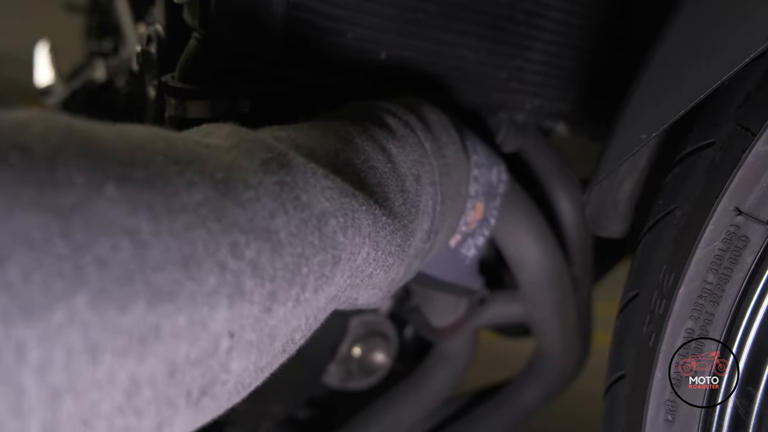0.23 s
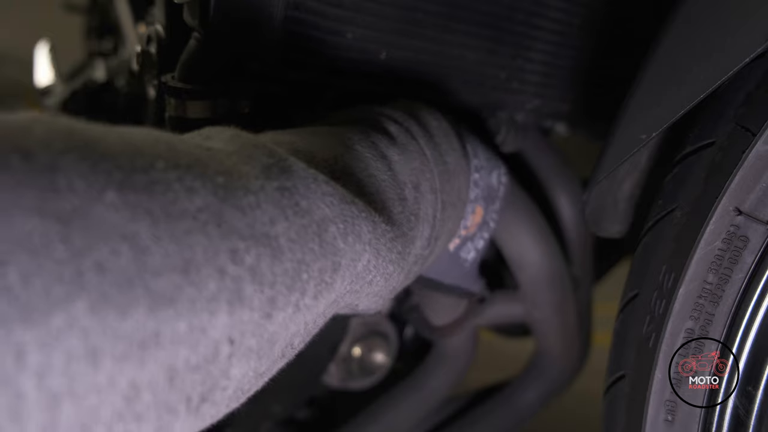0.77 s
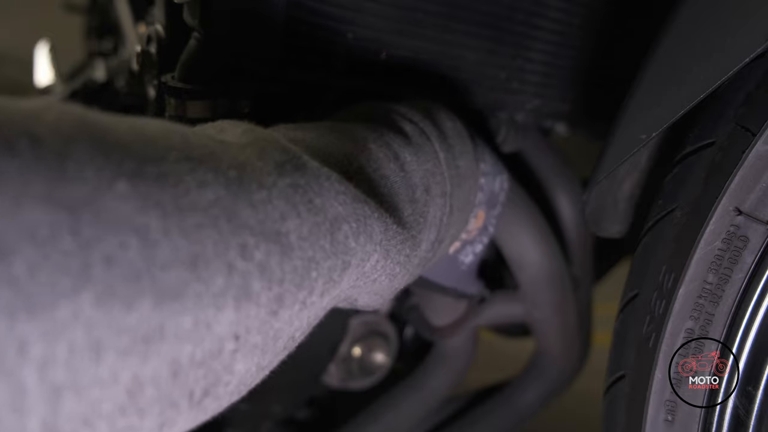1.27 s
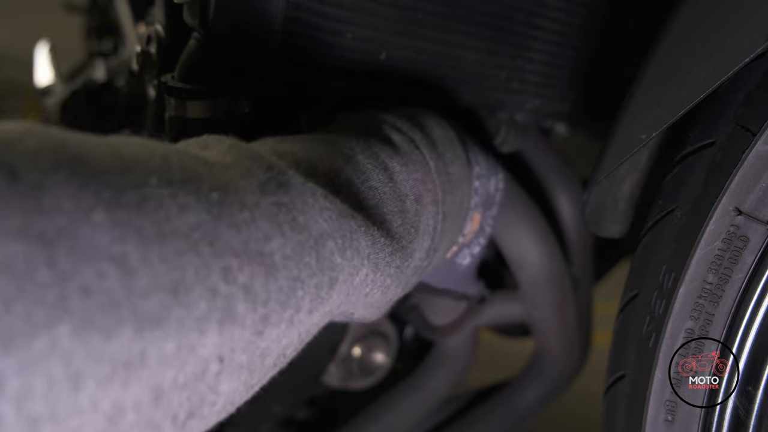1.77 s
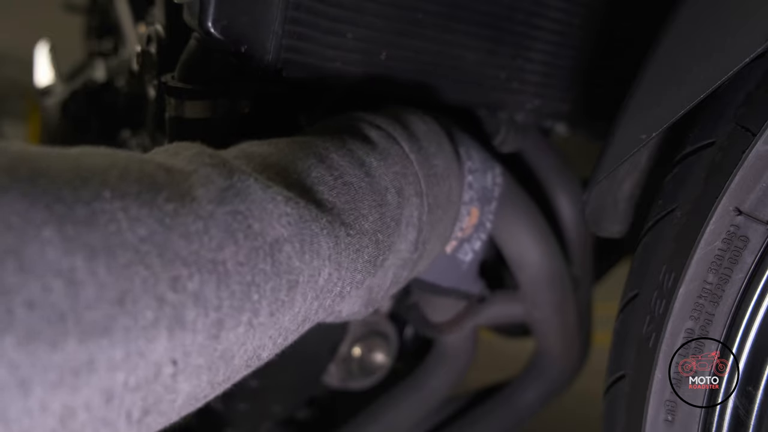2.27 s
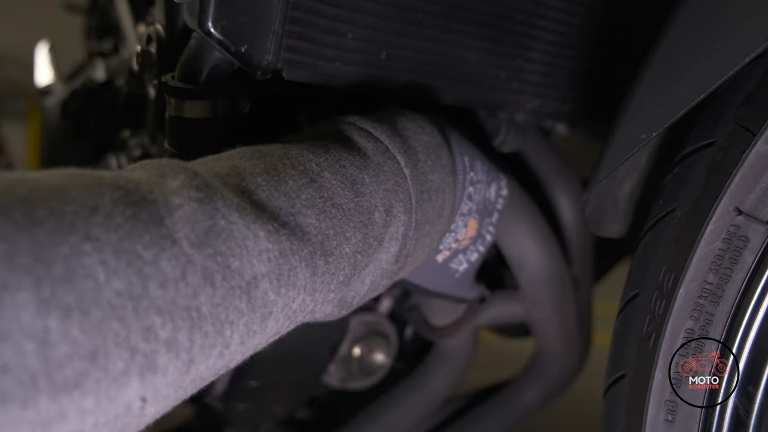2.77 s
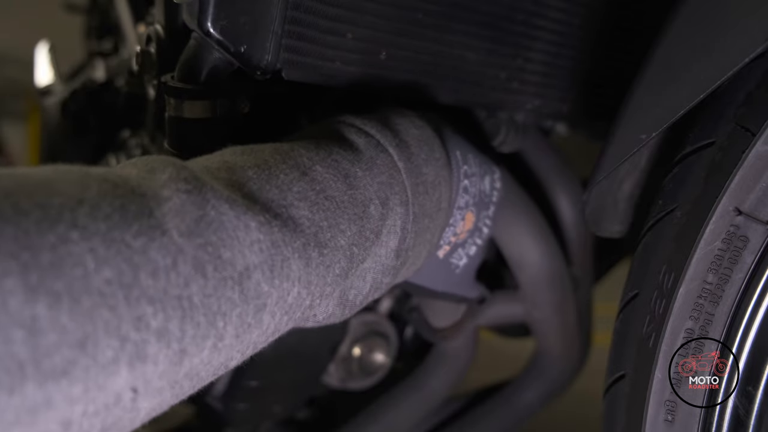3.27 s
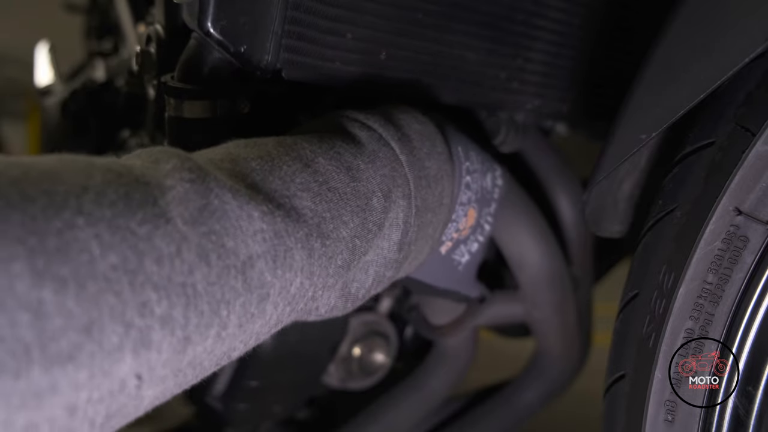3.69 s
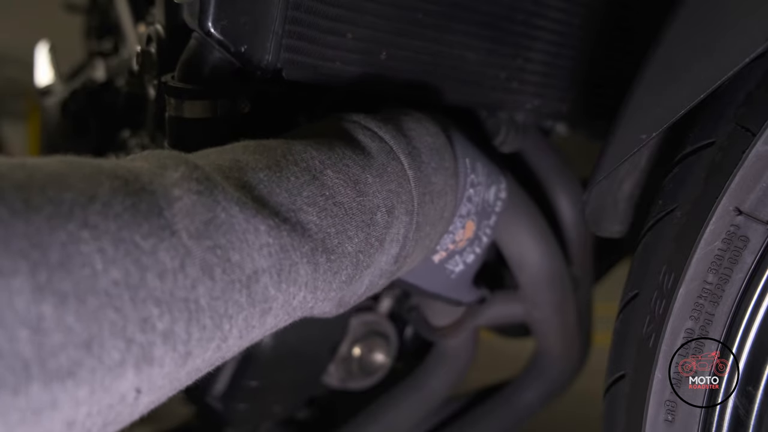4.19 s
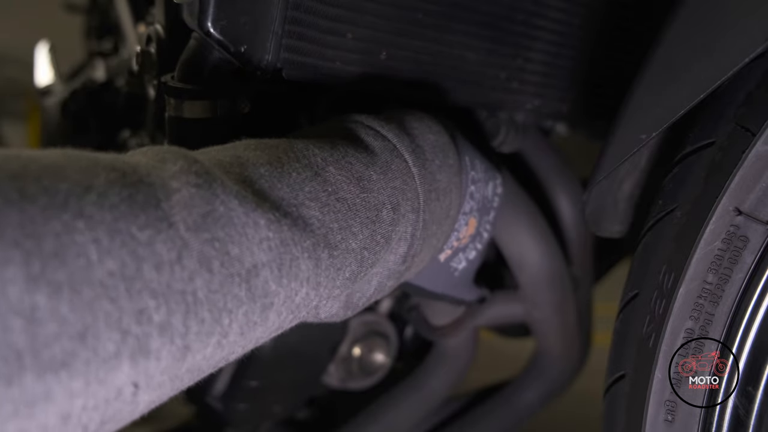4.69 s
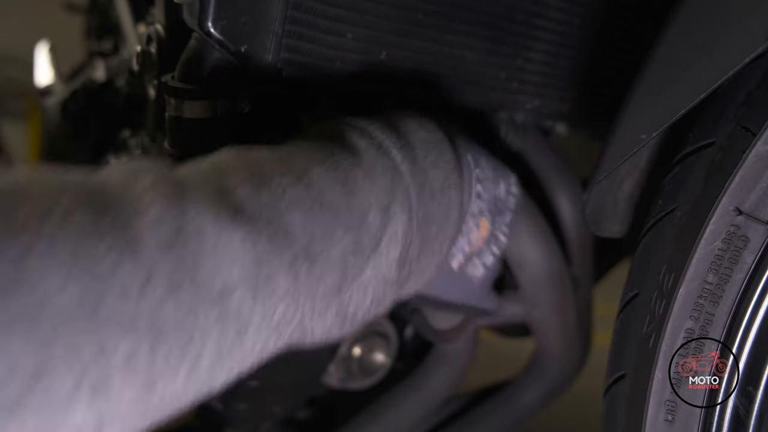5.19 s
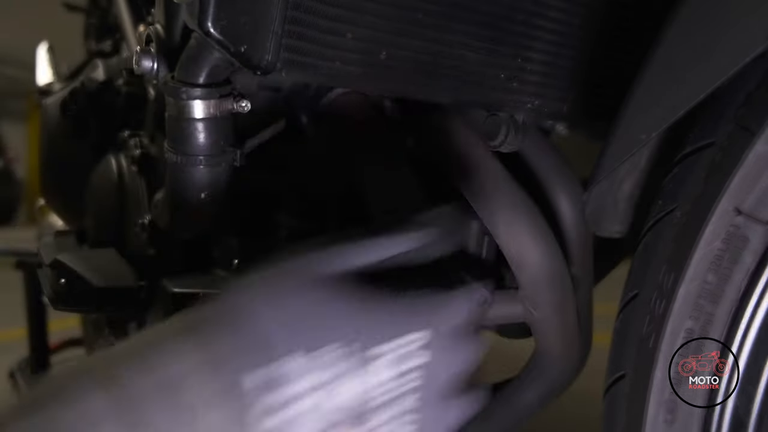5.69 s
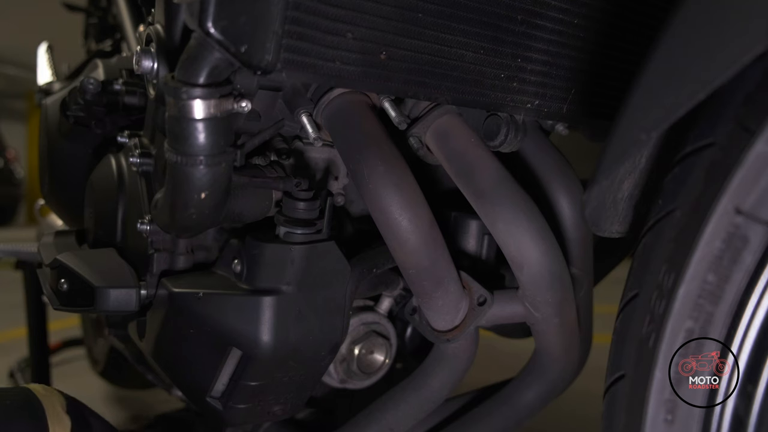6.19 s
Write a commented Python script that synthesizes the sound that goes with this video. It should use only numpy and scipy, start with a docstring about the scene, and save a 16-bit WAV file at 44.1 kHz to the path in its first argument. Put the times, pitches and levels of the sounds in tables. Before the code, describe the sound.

A tight motorcycle exhaust bolt is loosened by hand, heard close in a large garage with a light echo and a faint, steady ventilation hum. The dry thread gives very high, gliding, slightly gritty squeaks, each a fraction of a second long. They come right at the start, then around 0.4, 1.3, 1.7, 2.0, 2.4, 2.8 and 3.2 seconds. The strongest cluster rises in pitch at about 3.5 seconds, and a last one follows near 4.6. A thin, high ring from the steel tool lingers after several squeaks. Between turns the tool makes quiet ticks and scuffs, with a few very faint peeps. At about 5.2 seconds a single short, hollow knock ends the work. A sleeve then rustles softly as the arm draws back, mostly from 5.6 to 6.4 seconds, with one more light tick at 6 seconds.

```python
"""High, gliding squeaks come in short bursts: a tight motorcycle exhaust bolt is being loosened by hand.
At each turn the dry thread sticks and slips, and the tool ticks as it is set for the next turn.
A hollow knock ends the work, and a sleeve rustles as the arm is drawn back.
The squeaks, ticks and knock echo in a large garage, where the ventilation hums throughout."""
import sys
import numpy as np
from scipy import signal
from scipy.fft import rfft, irfft, next_fast_len
from scipy.io import wavfile
from scipy.ndimage import uniform_filter1d

SR = 44100
rng = np.random.default_rng(int(sys.argv[2]) if len(sys.argv) > 2 else 0)


def master(y):
    """Save y as 16-bit WAV."""
    cut = np.clip(np.atleast_2d(y).T, -1, 1)
    pcm = np.round(cut * 32767)  # scale
    wavfile.write(sys.argv[1], SR, pcm.astype(np.int16))


N = 284004
LEAD = SR // 10   # extra samples before time zero, so the scene can open in mid-squeak
TIME = np.arange(-LEAD, N) / SR


# Slips of the thread, a few to each turn: t/s, length/s, starting f/Hz, final f/Hz, relative level/dB
SLIPS = [(-.055, 0.053, 8450, 12600, -28.5), (0.357, 0.039, 9650, 11750, -28),
         (0.405, 0.0067, 11900, 12050, -32), (0.487, .012, 9350, 9330, -27.5),
         (1.261, .011, 8320, 9900, -27), (1.277, 0.014, 10350, 10000, -27.5),
         (1.296, 0.018, 8760, 9100, -24.5), (1.67, 0.016, 6830, 8500, -19), (2.041, .035, 7670, 11740, -27),
         (2.076, 0.021, 11600, 11000, -30.5), (2.384, 0.0118, 7770, 8710, -28),
         (2.4, 0.0092, 8500, 8740, -23.5), (2.411, 0.013, 9050, 9400, -24),
         (2.429, 0.02, 9330, 10400, -37.5), (2.45, 0.0067, 9630, 9630, -22), (2.738, .014, 6940, 6540, -33),
         (2.751, 0.015, 5660, 5340, -25.5), (2.77, 0.0127, 6220, 6500, -25),
         (2.785, 0.024, 7330, 7560, -26), (3.180, 0.0098, 11470, 12040, -28.5),
         (3.421, 0.0078, 4630, 4700, -24), (3.426, .011, 5500, 5370, -27), (3.437, 0.017, 5370, 6020, -20),
         (3.457, 0.021, 6830, 9000, -19), (3.486, 0.0083, 7730, 9550, -17.5),
         (3.506, .007, 9100, 9500, -19), (4.528, 0.034, 6150, 6950, -28), (4.565, 0.0086, 7170, 7570, -20),
         (4.574, 0.0094, 8020, 9200, -20)]
def thread_slips(attack_s=0.0038, release_s=0.0023, fade_db=2, overshoot=.16, settle_s=0.0015):
    """Pitch and level of the squeak: a slip from rest starts too high, settles, glides and lets go."""
    lag_s = 0.0022   # time the pitch takes to change from one slip to the next
    hz, level = np.zeros(len(TIME)) + SLIPS[0][2], np.zeros(len(TIME))
    for s, length, start_hz, end_hz, db in SLIPS:
        near = (TIME >= s - lag_s / 2) & (TIME < s + length + 20 * release_s)
        age = np.maximum(TIME[near] - s, 0)
        progress = np.minimum(age / length, 1)
        glide = start_hz + (end_hz - start_hz) * progress ** 1.25   # starts slowly, gathers speed
        at_rest = 1 - min(level[near][0] / from_db(db - fade_db), 1)   # a moving thread does not catch
        hz[near] = glide * (1 + at_rest * overshoot * np.exp(-age / settle_s))
        envelope = np.minimum(age / attack_s, 1) * np.exp(-np.maximum(age - length, 0) / release_s)
        level[near] = np.maximum(level[near], from_db(db - fade_db * progress) * envelope)
    return uniform_filter1d(hz, 1 + int(lag_s * SR)), level


def bolt_squeak(wobble=.010, flutter_hz=600, rasp=1.9, grit_db=-19, dull_above_hz=15400):
    """The dry thread sticks and slips so fast that it sings, with a wavering, gritty tone."""
    hz, level = thread_slips()
    # a slow slip sings steadily, a fast one wavers; the harder it is forced, the more it rasps
    speed = np.minimum(hz / 9000, 1)
    wavering_hz = hz * (1 + wobble * speed ** .5 * wander(700))
    phase = 2 * np.pi * np.cumsum(wavering_hz) / SR
    flutter = from_db(4.0 * wander(flutter_hz))
    flutter *= 7.5 + rasp * speed ** 2 * level * wander(4300)

    def harmonic(order):
        """A tone at a multiple of the pitch, mixed with its quick echoes, then evened out in level."""
        tone = (level > 0) * flutter * np.exp(1j * order * phase)
        tone = bike_echoes(tone, echo_db=-16.5, spread_s=.005)
        power = uniform_filter1d(abs(tone) ** 2, int(.0035 * SR))
        audible = np.clip((.42 * SR - order * hz) / 1000, 0, 1)   # silent when too high to hear
        treble_loss = np.sqrt(1 + (order * hz / dull_above_hz) ** 16)
        return audible / treble_loss * np.sqrt(2) * tone.real / np.sqrt(power + 1e-9)

    # the lopsided slip adds overtones, and the dry thread grates
    overtones = from_db(-9) * harmonic(2) + from_db(-15) * harmonic(3)
    grating = shaped_noise([(200, -25), (1500, 13), (3000, 20), (6000, 2), (11000, -14), (16000, -39)])
    grit = from_db(grit_db) * level * grating
    return from_db(-0.17) * level * (harmonic(1) + overtones + grit)


def tool_ring(hz, level, ring_hz=8249, width_hz=330, gain_db=-2.5, ring_s=0.92):
    """The steel tool stores energy whenever the squeak glides past its own note, and rings on."""
    energy_in = level ** 2 * np.exp(-((hz - ring_hz) / width_hz) ** 2) / SR
    kept_per_sample = from_db(-60 / (ring_s * SR)) ** 2
    stored = signal.lfilter([1], [1, -kept_per_sample], energy_in + 1e-20)
    return from_db(gain_db) * np.sqrt(2 * stored) * np.sin(2 * np.pi * ring_hz * TIME)


# The tool shifting on the bolt head: t/s, relative level/dB, fade time/s
SCUFFS = [(0.264, -51, 0.012), (1.554, -51.5, 0.013), (1.749, -53, 0.015), (2.328, -51, 0.022),
          (4.345, -59.5, .022), (4.469, -52, 0.016), (4.947, -53, 0.023), (5.144, -55.5, 0.12)]
# Light metal ticks: t/s, relative level/dB, ping f/Hz
TICKS = [(0.0633, -53, 3430), (0.6083, -49.5, 3570), (.702, -49, 4120), (0.939, -41.5, 3780),
         (1.104, -38, 4260), (2.607, -49.5, 3640), (3.058, -45, 3780), (3.711, -50, 3500),
         (4.566, -36, 5300), (4.652, -39, 4600), (5.999, -41, 5000)]
# Faint peeps as the tool swings back: t/s, f/Hz, level/dB, length/s
PEEPS = [(1.569, 3300, -57, 0.012), (1.86, 3534, -67, .03), (1.993, 3310, -60, 0.024),
         (4.87, 3986, -60, 0.028), (5.023, 4000, -60.5, 0.048)]
# Tone colour of the tool touching the bolt: f/Hz, relative level/dB
CONTACT_COLOUR = [(100, -39), (500, -6.5), (1500, -8.5), (2500, -17.5), (3300, -7), (5200, -7.5),
                  (8000, -11.5), (12000, -20), (16000, -38)]
def tool_handling(snap_s=0.0094, snap_db=-9, ping_s=0.0056, ping_db=-11):
    """Metal touches metal as the tool is set between turns: it scuffs, ticks and peeps."""
    contact, tones = 0, 0
    for s, db, length in SCUFFS:   # a scuff bites quickly and slides to rest
        bite = np.clip((TIME - s) / .008, 0, 1)
        contact += from_db(db) * bite * swell(s, 2 * length)
    for s, db, hz in TICKS:   # a tick is a snap and a short ping
        struck, age = from_db(db) * (TIME >= s), abs(TIME - s)
        contact += struck * from_db(snap_db) * np.exp(-age / snap_s)
        tones += struck * from_db(ping_db) * np.exp(-age / ping_s) * pitched_noise(hz, width_hz=450)
    for s, hz, db, length in PEEPS:
        tones += from_db(db) * swell(s, length) * pitched_noise(hz, width_hz=55)
    return contact * shaped_noise(CONTACT_COLOUR) + tones


# A light touch, then the full blow: t/s, relative level/dB, contact time/s (longer sounds duller)
BLOWS = [(5.2005, -15.5, 0.000085), (5.2037, -0.5, 0.0007)]
# Notes the knocked part rings with: f/Hz, relative level/dB, time to fade by 60 dB/s
KNOCK_NOTES = [(490.8, -30.5, 0.68), (570, -34, 0.088), (700, -27.5, 0.17), (744, -7, 0.047),
               (787, -18, 0.066), (1013, -32.5, 0.086), (1110, -18.5, 0.12), (1345, -21, 0.046),
               (1467, -23, 0.039), (1610, -16.5, 0.037), (1950, -20, 0.018), (2230, -28, 0.038),
               (2436, -18, 0.048), (2700, -20, 0.033), (2970, -22.5, 0.029), (4220, -23.5, 0.027)]
# Tone colour of the two faces grinding as they meet: f/Hz, relative level/dB
CRUNCH_COLOUR = [(300, -42), (500, 7), (900, 0.5), (1600, -2), (2800, -10.5), (3500, -20), (16000, -38)]
def hollow_knock(low_cut_hz=400, crunch_db=-25, crunch_s=0.0061):
    """A blow sets a part ringing, with a brief crunch; the knock carries no bass."""
    force = 0
    for s, db, contact_s in BLOWS:
        push = swell(s, contact_s / 2)
        force += from_db(db) * push / push.sum()
    body = sum((-1) ** k * from_db(db) * ringing_note(force, hz, ring_s)
               for k, (hz, db, ring_s) in enumerate(KNOCK_NOTES))
    progress = np.maximum(TIME - BLOWS[0][0], 0) / crunch_s
    envelope = np.tanh(2 * progress) * np.exp(-np.minimum(progress, 20))
    crunch = from_db(crunch_db) * envelope * shaped_noise(CRUNCH_COLOUR)
    return signal.sosfilt(signal.butter(2, low_cut_hz, "high", fs=SR, output="sos"), body + crunch)


# Strokes of the sleeve as the arm is drawn back: t/s, length/s, rub level/dB, hiss level/dB
STROKES = [(5.214, 0.034, -61, -55.5), (5.87, 0.42, -53, -70.5), (6.162, 0.33, -56.5, -57)]
# Tone colours of the cloth's rub and hiss: f/Hz, relative level/dB
RUB_COLOUR = [(50, -2), (300, 7.5), (600, 7.5), (1200, 1.5), (2300, -4), (4000, -6.5), (8000, -15.5),
              (16000, -45)]
HISS_COLOUR = [(200, -40), (1500, -40), (3400, -3), (4700, 4), (7000, 0), (9500, -3.5), (13500, -3),
               (16000, -22)]
def sleeve_rustle(grain_db=1.5):
    """Cloth slides in smooth strokes: a dull rub and a finer hiss, both uneven."""
    rub = sum(from_db(db) * swell(s, length) for s, length, db, _ in STROKES)
    hiss = sum(from_db(db) * swell(s, length) for s, length, _, db in STROKES)
    cloth = rub * shaped_noise(RUB_COLOUR) + hiss * shaped_noise(HISS_COLOUR)
    return cloth * from_db(grain_db * wander(143))


# Notes the air ducts hum: f/Hz, width/Hz, level/dB
DUCT_NOTES = [(121.5, 10.4, -61), (212, 48, -58), (237.9, 15.3, -51.5), (282, 23, -63)]
# Tone colour of the moving air: f/Hz, relative level/dB
AIR_COLOUR = [(15, -74), (25, -36), (80, -13), (145, -13.5), (236, -4.5), (335, -7.5), (373, -19.5),
              (754, -25.5), (1440, -32), (1560, -34), (3620, -35.5), (3920, -33.5), (4250, -34),
              (9320, -38), (16000, -41)]
def ventilation(rush_db=-52):
    """The ducts hum at a few low notes over a soft rush of air."""
    hum = sum(from_db(db) * pitched_noise(hz, width) for hz, width, db in DUCT_NOTES)
    return hum + from_db(rush_db) * shaped_noise(AIR_COLOUR)


def bike_echoes(sound, echo_db, spread_s, count=14):
    """The sound plus its quick echoes off the engine, pipes and radiator; later ones are weaker."""
    out = sound.copy()
    for delay, sign in zip(rng.uniform(.08, 1, count), rng.choice([-1, 1], count)):
        out += sign * from_db(echo_db) * (1.2 - delay) * np.roll(sound, int(delay * spread_s * SR))
    return out


# How sound lingers in the garage: f/Hz, time to fade by 60 dB/s, relative level/dB
GARAGE_TAIL = [(300, 2.4, -2), (755, 1.4, 3), (2500, 1.5, -1.5), (5500, 0.95, -4), (6360, 1.35, -1),
               (8130, 0.71, 0), (10900, 0.57, -2.5), (14920, 0.41, 1.5)]
def garage_echo(sound, early_db, tail_db, early_s=0.025):
    """Echoes off the floor and the bike, then a long blurred tail whose treble dies first."""
    t = np.arange(SR * 3 // 2) / SR
    hz = np.arange(len(t) // 2 + 1) * SR / len(t)
    white = rfft(rng.standard_normal(len(t)))
    centres, tail = np.geomspace(200, 16000, num=14), 0
    for centre, share in zip(centres, np.eye(len(centres))):
        band = irfft(white * np.interp(hz, centres, share), len(t))
        fade = from_db(-60 * t / look_up(GARAGE_TAIL, centre))
        tail += band * from_db(look_up(GARAGE_TAIL, centre, column=2)) * fade
    early = rng.standard_normal(len(t)) * np.exp(-t / early_s)
    arrival = np.clip(t / 0.0027 - 1, 0, 1)   # the first echo takes a moment to come back
    response = (from_db(early_db) * early + from_db(tail_db) * tail) * arrival
    return signal.fftconvolve(sound, response)[:len(sound)]


def from_db(db):
    """Turn decibels into a number to multiply by."""
    return 10 ** (np.asarray(db) / 20)


def look_up(table, hz, column=1):
    """Read a table at any frequency, blending between its rows on a pitch scale."""
    rows = np.array(table)
    return np.interp(np.log(hz + 1e-9), np.log(rows[:, 0]), rows[:, column])


def noise(gain_at):
    """Noise of average power 1; gain_at says how strong each frequency is."""
    size = next_fast_len(len(TIME))
    hz = np.arange(size // 2 + 1) * SR / size
    shaped = irfft(rfft(rng.standard_normal(size)) * gain_at(hz))[:len(TIME)]
    return shaped / np.sqrt(np.mean(shaped ** 2) + 1e-20)


def shaped_noise(colour):
    """Noise with a tone colour given as rows of f/Hz, relative level/dB."""
    return noise(lambda hz: from_db(look_up(colour, hz)))


def pitched_noise(hz, width_hz):
    """Noise gathered around one frequency, so it sounds like a rough note."""
    return noise(lambda f: 1 / (1 + ((f - hz) / width_hz) ** 2))


def wander(rate_hz):
    """A random wobble of typical size 1, up to about the given rate."""
    return noise(lambda hz: 1 / (1 + (hz / rate_hz) ** 4))


def ringing_note(force, hz, ring_s):
    """One note of a struck object: each push starts a pure tone that fades by 60 dB in ring_s."""
    decay, step = from_db(-60 / (ring_s * SR)), 2 * np.pi * hz / SR
    return signal.lfilter([0, np.sin(step)], [1, -2 * decay * np.cos(step), decay ** 2], force + 1e-18)


def swell(s, length):
    """A smooth rise and fall around time s."""
    return np.exp(-np.minimum(2 * ((TIME - s) / length) ** 2, 100))


def scene():
    """All sources in one channel: squeaks, ticks and knock echo, with the tool's thin ring on top."""
    metal, knock = bolt_squeak() + tool_handling(), hollow_knock()
    metal += garage_echo(metal, early_db=-38, tail_db=-47)
    knock += garage_echo(knock, early_db=-30, tail_db=-43)
    mix = metal + tool_ring(*thread_slips()) + knock + sleeve_rustle() + ventilation()
    return mix[None, LEAD:]


def record(dry, cutoff_hz=15850):
    """The very highest treble is cut off steeply."""
    return signal.sosfilt(signal.ellip(12, .1, 90, cutoff_hz, fs=SR, output="sos"), dry)


dry = scene()
out = record(dry)
master(out)
```